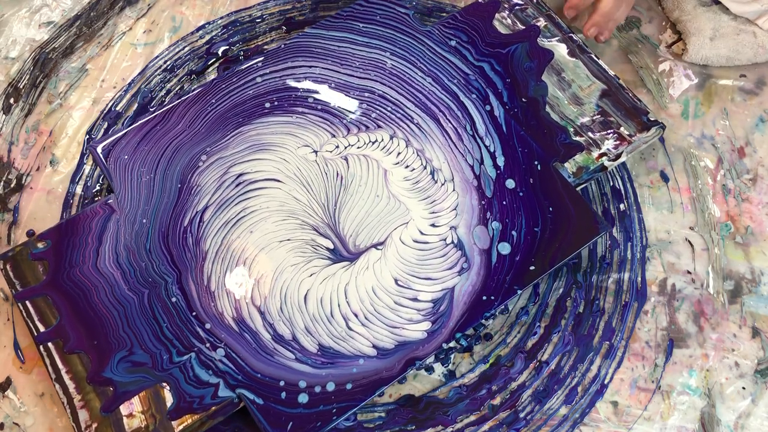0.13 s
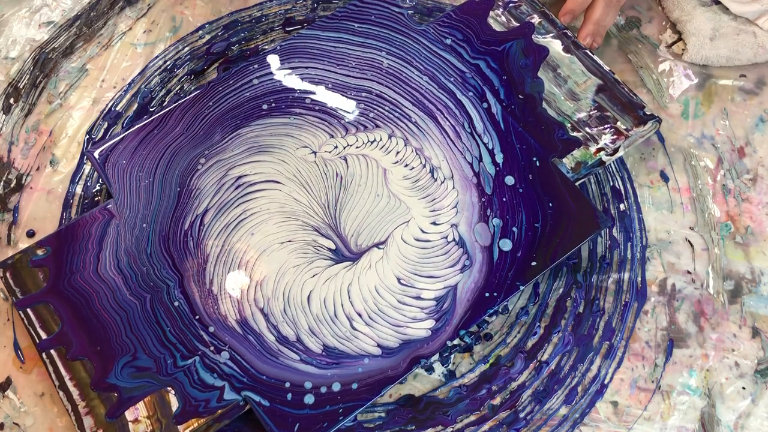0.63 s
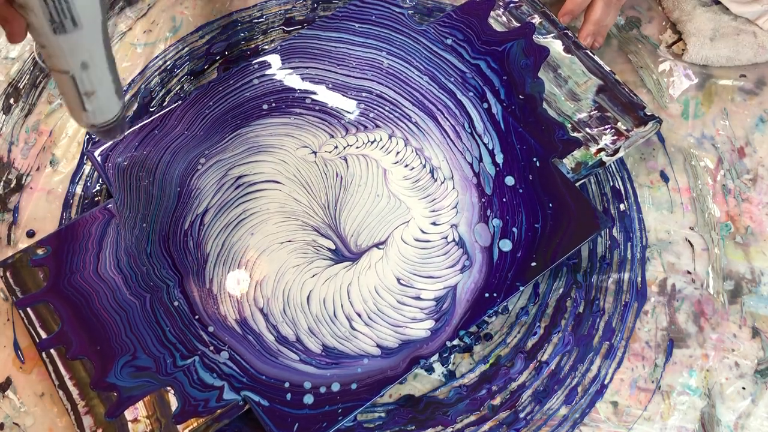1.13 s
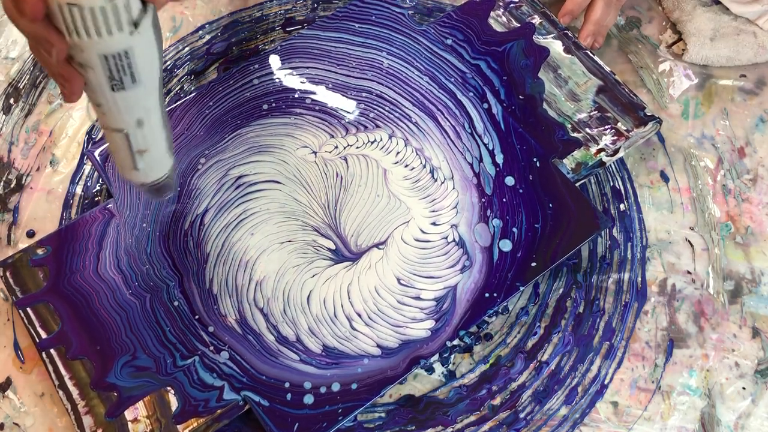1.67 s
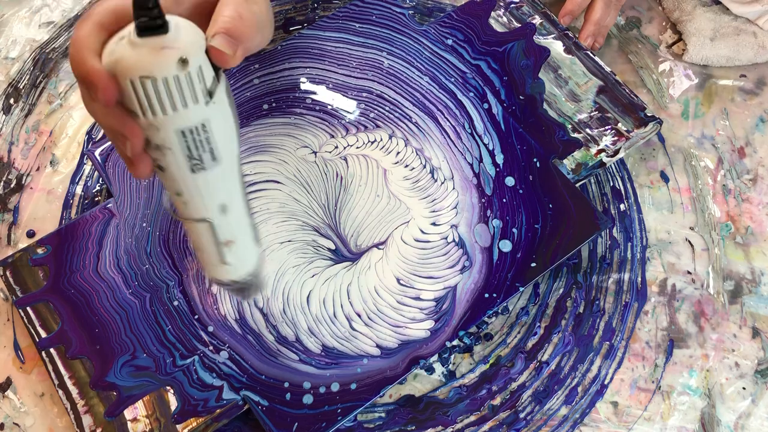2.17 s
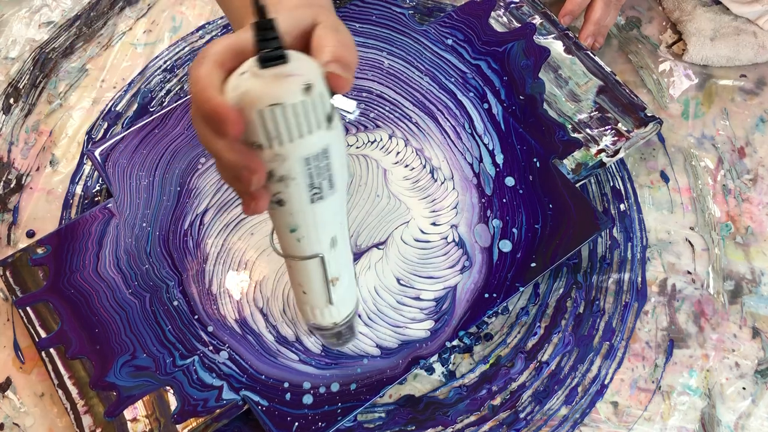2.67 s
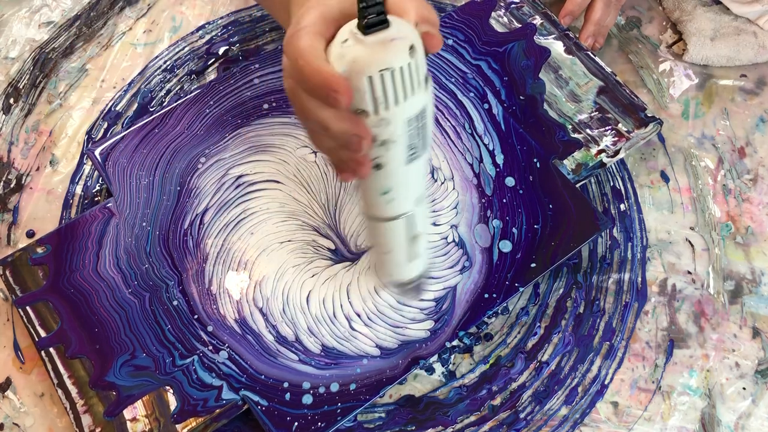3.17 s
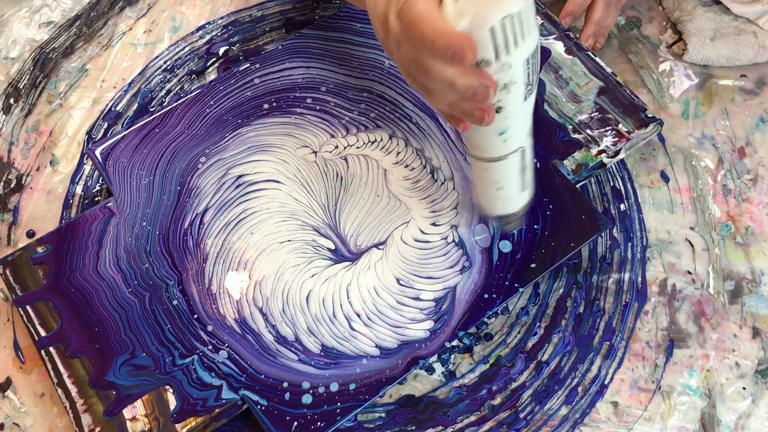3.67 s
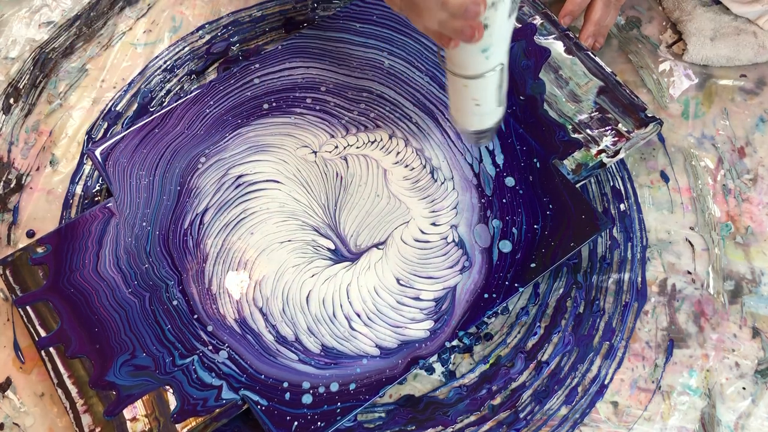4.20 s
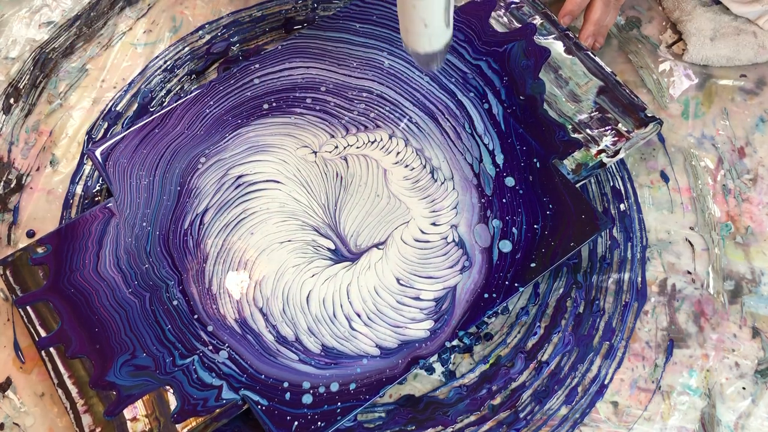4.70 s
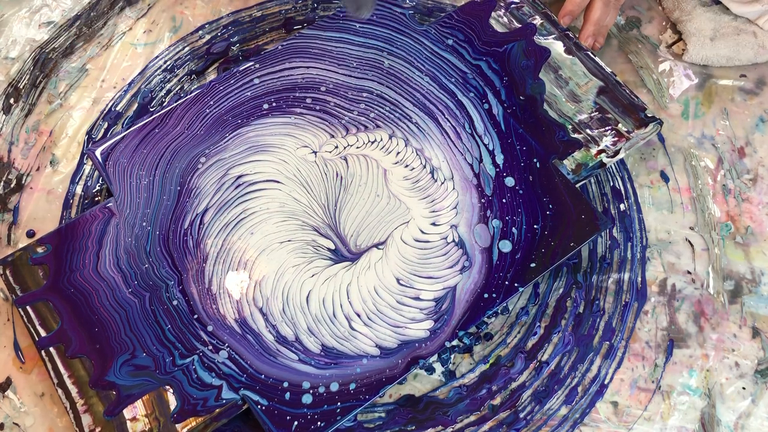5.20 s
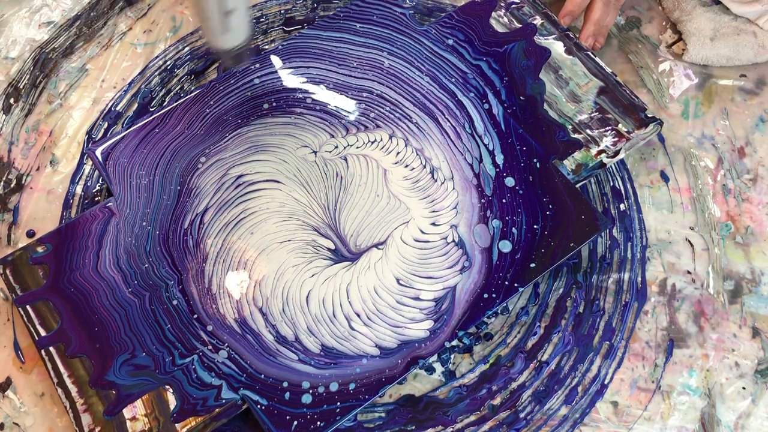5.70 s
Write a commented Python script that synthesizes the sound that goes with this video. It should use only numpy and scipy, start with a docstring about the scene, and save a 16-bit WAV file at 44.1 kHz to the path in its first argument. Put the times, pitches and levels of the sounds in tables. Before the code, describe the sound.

Close single-microphone sound in a small quiet room. Faint low room noise and tiny hand rustles, then a sharp plastic switch click and a brief rotor rattle. A handheld electric blower whines up within half a second and runs to the end, breathy air and motor tones swelling and fading as it moves over a wet painting.

```python
"""A handheld hot-air blower is switched on in a small quiet room and swept about under one microphone. Noisy
clicks of the switch ring its case, two faint echoes follow, and a brief scraping rattle sounds. Air is shaped
noise that rings the barrel; the motor is a set of sines at multiples of the shaft speed, and it whines as it
runs up. Tones and barrel modes swell and fade as the hand turns the tool, over faint room noise and rustles."""
import sys
import numpy as np
from scipy import signal
from scipy.fft import rfft, irfft, next_fast_len
from scipy.io import wavfile
from scipy.ndimage import uniform_filter1d

SR = 44100
rng = np.random.default_rng(int(sys.argv[2]) if len(sys.argv) > 2 else 0)


def invert_db(x):
    """Field ratio 10**(x/20) for x, a level in decibels (scalar or array-like)."""
    u = np.asarray(x, float) / 20
    return 10 ** u


def unload_audio(sound):
    """Save the sound as a 16-bit wav file, at the path given as the first command line argument."""
    columns = np.transpose(np.atleast_2d(sound))
    # keep every value between -1 and 1, then stretch to whole-number steps
    steps = np.round(np.clip(columns, -1, 1) * 32767)
    wavfile.write(sys.argv[1], SR, steps.astype(np.int16))


N = 257544  # samples
T = np.arange(N) / SR  # seconds
SWITCH_ON_S, RUN_UP_S = .923, .164


def level(x, db):
    """Scale to an rms level."""
    return x * invert_db(db) / np.sqrt(np.mean(x ** 2))


def curve(rows):
    """Join the points of a (time, value, ..) table with straight lines, one signal per value column."""
    s, *columns = np.transpose(rows)
    return [np.interp(T, s, c) for c in columns]


def bump(centre_s, half_s):
    """A smooth rise and fall that peaks at 1."""
    return np.exp(-((T - centre_s) / half_s) ** 2)


def shape(x, gain):
    """Filter by a gain given as a function of frequency in Hz."""
    size = next_fast_len(N + 4096)
    hz = np.fft.rfftfreq(size, 1 / SR) + 1  # 1 Hz up, so that no frequency is zero
    return irfft(rfft(x, size) * gain(hz), size)[:N]


def coloured(points):
    """Noise with a spectrum given by (pitch_hz, level_db) points."""
    hz, db = np.transpose(points)
    return shape(rng.standard_normal(N), lambda f: invert_db(np.interp(np.log(f), np.log(hz), db)))


def ringing(hz, width, steep=0.94):
    """Noise through one resonance, rms 1; a larger steep makes the skirts fall faster."""
    def gain(f):
        return (1 + ((f - hz * hz / f) / width) ** 2) ** (-steep / 2)
    return level(shape(rng.standard_normal(N), gain), 0)


def walk(rate):
    """Random levels held for 1 / rate seconds, then smoothed twice; spread near 1."""
    hold = int(SR / rate)
    steps = np.repeat(rng.standard_normal(N // hold + 1), hold)
    return 1.3 * uniform_filter1d(uniform_filter1d(steps, hold), hold)[:N]


# Colour of the steady room noise: pitch_hz, relative level_db
ROOM_COLOUR = [(18, -64), (30, -35), (64, -10), (81, -23.5), (103, -30), (183, -22), (209, -4), (286, -17),
               (353, -17), (382, -10.5), (1010, -11), (1450, -15.5), (15800, -36)]
# Wavering narrow bands in the room: pitch_hz, width_hz, middle level_db
ROOM_BANDS = [(105.8, 8.8, -71), (174, 15, -72), (337, 29, -72.5), (10020, 120, -95)]
# Faint rustles of the hand: centre_s, middle level_db, half_length_ms
HAND_RUSTLES = [(.035, -75, 12), (.165, -73, 10), (.215, -72, 14), (.685, -71, 8), (.85, -72, 11)]


def room():
    """Steady noise floor, narrow bands whose levels wander, and hand rustles of rough wide-band noise."""
    floor = level(coloured(ROOM_COLOUR), -66.5)
    bands = sum(invert_db(db + 2.0 * walk(4.5)) * ringing(hz, width) for hz, width, db in ROOM_BANDS)
    rustle = sum(invert_db(db) * bump(s, ms / 1000) for s, db, ms in HAND_RUSTLES)
    return floor + bands + rustle * invert_db(3 * walk(500)) * ringing(6400, 12000)


# A brief scraping rattle: time_s, level_db
SCRAPE_RATTLE = [(.945, -57), (.965, -46.5), (.985, -46), (1.0, -48), (1.03, -57), (1.06, -70)]


def rattle():
    """Loudness of the scraping rattle, zero before and after."""
    return invert_db(curve(SCRAPE_RATTLE)[0]) * (T > SCRAPE_RATTLE[0][0]) * (T < SCRAPE_RATTLE[-1][0])


# Switch contacts, then two faint echoes of the click from the room: start_s, relative level_db, decay_ms
CLICKS = [(.9131, -27, .35), (.9137, -29, .3), (.9143, -22, .35), (.9150, -24, .4), (.9159, -29, .5),
          (.9235, -42, 1.), (.9325, -44, 1.)]
# Ring of the switch and case: pitch_hz, relative level_db, time_to_fall_60_db_s
CASE_RING = [(1980, -1, .011), (2600, -6, .006), (3200, -10, .005), (3980, -9, .006), (5070, -8, .005),
             (6000, -5, .006), (6900, -10, .005), (8500, -2, .005), (9740, -9, .006), (11800, -13, .004),
             (12700, -12, .006), (14800, -11, .004)]


def switch():
    """Short noisy clicks and their two echoes carry the ring of the case; a brief scraping rattle follows as
    noise."""
    bursts = sum(invert_db(db) * (T > s) * np.exp(-np.abs(T - s) / (ms / 1000)) for s, db, ms in CLICKS)
    clicks = rng.standard_normal(N) * bursts
    t = T[:2048]
    ring = sum(invert_db(db) * np.cos(2 * np.pi * hz * t) * np.exp(-np.log(1000) * t / t60)
               for hz, db, t60 in CASE_RING)
    # the bare click noise is added 6 dB up to the ringing case
    snap = signal.fftconvolve(clicks, ring)[:N] + invert_db(6) * clicks
    # the whole snap radiates no bass
    no_bass = signal.butter(4, 1500, "high", fs=SR, output="sos")
    snap = signal.sosfilt(no_bass, snap)
    knocks = rattle() * invert_db(2.2 * walk(400))
    scrape = ringing(2300, 1200) + 0.58 * ringing(4200, 750) + 0.57 * ringing(1360, 400)
    return invert_db(-18.0) * snap + knocks * scrape


def speed():
    """Share of full speed: it climbs fast after the switch closes, then ever more slowly."""
    return 1 - np.exp(-np.maximum(T - SWITCH_ON_S, 0) / RUN_UP_S)


# Colour of the air rush: pitch_hz, relative level_db
RUSH_COLOUR = [(60, -54), (110, -29), (250, -15.5), (450, -13), (850, -8.5), (1100, -11.5), (1600, -8),
               (2400, -15), (3300, -12), (4300, -15), (5300, -14), (6300, -10), (7200, -14), (9000, -12.5),
               (12500, -15), (15800, -14.5)]
# Steadier housing resonances: pitch_hz, width_hz, middle level_db against the rush
SHELL_MODES = [(481, 114, -17), (780, 110, -19.5), (2827, 580, -12), (5610, 440, -15), (6730, 400, -14),
               (8440, 470, -16.5), (11300, 400, -19.5), (14000, 1500, -24)]
# Barrel and housing modes rung by the air: pitch_hz, width_hz, level_db against the rush,
# share of the sweep's treble_db, share of its balance_db
BARREL_MODES = [(183, 100, -24.5, -0.71, 0.14), (325.5, 36, -24, -1.1, 0.6), (672, 102, -12, -0.71, 1),
                (1350, 134, -11, -1.1, -0.38), (1956, 256, -7.5, -0.87, -0.34),
                (3742, 240, -11, 0.011, -0.051), (4760, 314, -11.5, 0.066, 0.23),
                (7530, 240, -13, -0.62, 0), (10300, 890, -9.5, 2.3, 0.085)]
# The air as the tool sweeps: time_s, rush_db, treble_db, balance_db (low barrel modes against middle ones)
TOOL_SWEEP = [(1.04, -37.5, -6, -3), (1.12, -36.5, -4.5, -7), (1.3, -36.5, -2, -4.5), (1.8, -36, -1, -1),
              (2.2, -35.5, 0, -0.5), (2.8, -36, -0.5, 1.5), (3.1, -36, -0.5, 0.5), (3.5, -36, -1, 0),
              (4.05, -37, -1.5, -1.5), (4.5, -37.5, -1.5, 6), (4.8, -38, -2, 4.5), (5.3, -37.5, -4, 3),
              (5.8, -37, -2, -3.5)]
# air amplitude grows as speed to AIR_POWER; bass needs an extra BASS_POWER
AIR_POWER, BASS_POWER = 2.36, 1.9


def air():
    """Rushing noise plus barrel and shell resonances, coloured by returns from the nozzle and the table."""
    rush_db, treble_db, balance_db = curve(TOOL_SWEEP)
    flow = speed() ** AIR_POWER
    let_through = invert_db(25) * rattle()  # air that passes during the rattle
    rush = level(coloured(RUSH_COLOUR), 0)
    for hz, width, db in SHELL_MODES:
        rush = rush + invert_db(db + 1.1 * walk(2.69)) * ringing(hz, width, steep=2.0)
    bass = shape(rush, lambda f: 1 / (1 + (f / 550) ** 4))
    rush = rush - (1 - speed() ** BASS_POWER) * bass
    treble = shape(rush, lambda f: 1 / (1 + (9500 / f) ** 4))
    dull = rush - treble
    # first puff: 13 dB under full flow, decaying over 0.03 s
    puff = invert_db(-13) * np.exp(-np.abs(T - SWITCH_ON_S) / .03)
    swept = dull + invert_db(treble_db) * np.sqrt(speed()) * treble
    rush = (flow + puff) * swept + let_through * dull

    barrel = 0
    for hz, width, db, treble_share, balance_share in BARREL_MODES:
        mode_db = db + treble_share * treble_db + balance_share * balance_db
        run_up = speed() ** (BASS_POWER * 300 / hz)  # low modes come up later
        barrel = barrel + invert_db(mode_db) * run_up * ringing(hz, width, steep=1.38)
    both = invert_db(rush_db) * (rush + barrel * (flow + let_through))
    # inverted return from the open nozzle after 1.06 ms
    both = shape(both, lambda f: 1 - 0.074 * np.exp(-2j * np.pi * f * 0.00106))
    # the table returns it a moment later; the gap drifts as the hand moves, so the colour shifts
    lag_s = .0034 + .0003 * walk(1.5)
    both = both + .28 * np.interp(T - lag_s, T, both)
    return both * (T > SWITCH_ON_S)


# Speed the motor is heading for; it sags a little as the coil warms: time_s, turns_per_s
TOP_TURNS = [(2.3, 320.5), (2.8, 319.8), (3.2, 319.7), (3.5, 319.0), (4.3, 319.4), (5.8, 319.2)]
# Tones of the motor: multiple of the shaft speed
SHAFT_ORDERS = (1, 2, 3, 4, 5, 6, 7, 8, 9, 10, 11, 12, 13, 14, 15, 16, 17, 18, 20, 21, 22, 23, 24, 25, 26,
                29, 30, 32, 33, 34, 35, 36, 40, 42, 43, 45)
# Base level of each of these tones at full speed: level_db
SHAFT_ORDER_LEVELS = [-59.5, -58.5, -60, -58.5, -38.5, -62, -50, -49.5, -56.5, -57.5, -69, -57.5, -60.5,
                      -60.5, -59, -60.5, -64, -67, -62, -65, -58.5, -69, -58.5, -56.5, -62, -59, -57, -61,
                      -64, -65, -65, -66, -64, -67, -65, -66]
# Tones that follow the main whine: multiple of the shaft speed
WHINE_ORDERS = (5, 7, 8)
# Level change of the main whine as the tool turns: time_s, change_db
WHINE_LEVEL = [(1.03, 2), (1.1, 2), (1.16, -10), (1.2, -4), (1.27, -11.5), (1.33, -5.5), (1.41, -6),
               (1.5, -1), (1.62, -3.5), (1.8, -1.5), (2.1, -0.5), (2.5, 1.5), (3.05, 0), (3.22, -1.5),
               (3.38, -16), (3.56, -5.5), (3.76, -3), (4.28, 1.5), (4.64, 0.5), (4.82, -3.5), (5.0, 0),
               (5.36, 2.5), (5.83, -3)]
# Single tones swell or sink for a moment: multiple of the shaft speed, centre_s, half_length_s, change_db
TONE_SWELLS = [(6, 1.15, .09, 20), (20, 1.145, .025, 6), (8, 1.3, .06, 8), (20, 1.26, .03, 5),
               (4, 1.28, .2, 10), (7, 1.42, .05, 12), (8, 1.5, .15, 6), (30, 1.24, .1, 6),
               (6, 1.32, .065, 25), (10, 1.8, .3, 8), (7, 1.85, .2, 7), (24, 1.8, .15, 9), (25, 2.0, .2, 6),
               (24, 2.2, .2, 10), (12, 2.25, .25, 7), (30, 2.45, .15, 9), (24, 2.9, .2, 6),
               (30, 2.95, .2, 7), (25, 3.0, .12, 7), (12, 3.1, .15, 7), (8, 3.75, .15, -9),
               (30, 3.8, .2, 8), (8, 4.6, .35, 3), (12, 4.64, .12, 9), (30, 5.0, .12, 6), (25, 5.05, .3, 6),
               (24, 5.18, .1, 9), (12, 5.3, .3, 8), (25, 5.7, .3, 6), (30, 5.8, .22, 11),
               (7, 5.84, .15, -10)]


def barrel_lift_db(tone_hz):
    """Extra level of a tone near one of five barrel modes, 10 dB at the centre of each."""
    return 10 * sum(np.exp(-((tone_hz - hz) / width) ** 2) for hz, width, *_ in BARREL_MODES[3:8])


def motor():
    """Sines on the shaft orders grow with speed, stand out at barrel modes and wander as the tool turns."""
    turns = speed() * curve(TOP_TURNS)[0]
    # the shaft runs a little unevenly, which smears high orders most
    phase = 2 * np.pi * np.cumsum(turns) / SR + .012 * walk(40)
    out = 0
    for k, db in zip(SHAFT_ORDERS, SHAFT_ORDER_LEVELS):
        db = db + 1.53 * walk(20)  # quick flutter, dB
        # slow level changes, dB
        db = db + (curve(WHINE_LEVEL)[0] if k in WHINE_ORDERS else 3.5 * walk(3.987))
        for order, s, half_s, change_db in TONE_SWELLS:
            if order == k:
                db = db + change_db * bump(s, half_s)
        # the lift is counted from the one at the final speed
        db = db + barrel_lift_db(k * turns) - barrel_lift_db(k * turns[-1])
        out = out + invert_db(db) * np.sin(k * phase + .25 * walk(15) + 2 * np.pi * rng.random())
    return np.sqrt(2) * out * speed() ** 2.44


def walls(x):
    """Short tail from the walls: noise that starts after 3 ms and falls 60 dB in 0.12 s."""
    t = T[:SR // 4]
    tail = rng.standard_normal(len(t)) * np.exp(-np.log(1000) * t / 0.12) * (t > .003)
    tail = tail / np.sqrt(np.sum(tail ** 2))
    return invert_db(-15) * signal.fftconvolve(x, tail)[:N]


def scene():
    """The blower and its tail from the walls, over the room, the same on both channels."""
    blower = switch() + air() + motor()
    mono = room() + blower + walls(blower)
    return np.array([mono, mono])


def band_limit(x):
    """A steep low-pass at the top of the band."""
    return signal.sosfilt(signal.butter(12, 16590, fs=SR, output="sos"), x)


def record(dry):
    """One microphone on both channels, with a steep cut of the top above 15740 Hz."""
    top_cut = signal.ellip(12, .2, 80, 15740, fs=SR, output="sos")
    mix = signal.sosfilt(top_cut, dry)
    return band_limit(mix)


dry = scene()
out = record(dry)
unload_audio(out)
```